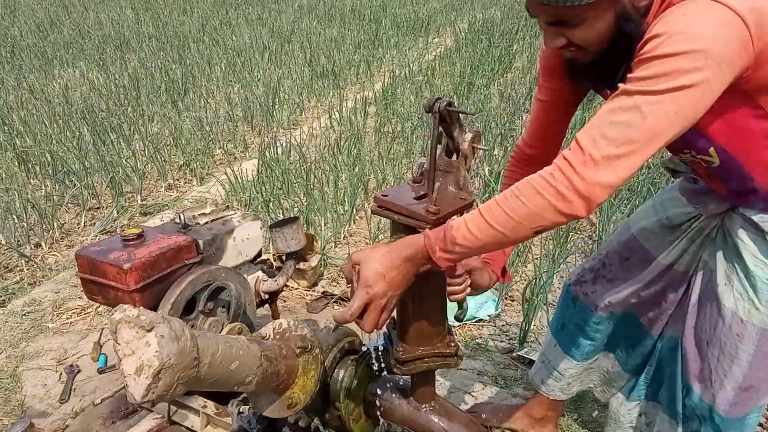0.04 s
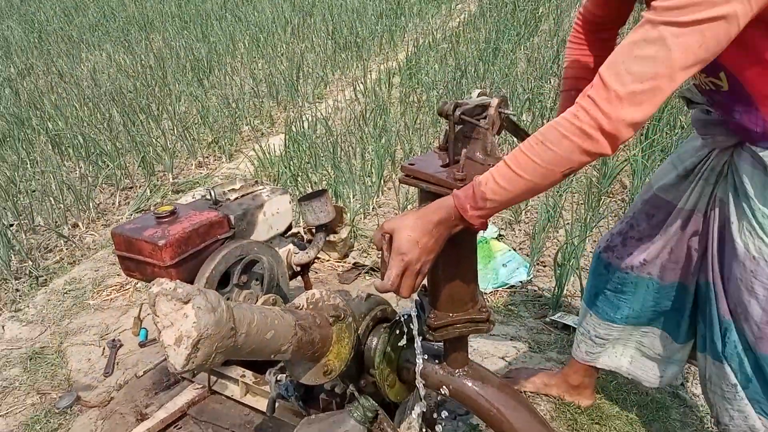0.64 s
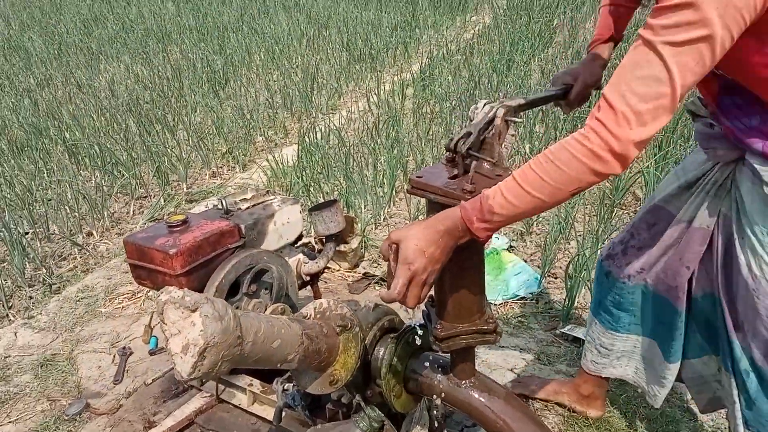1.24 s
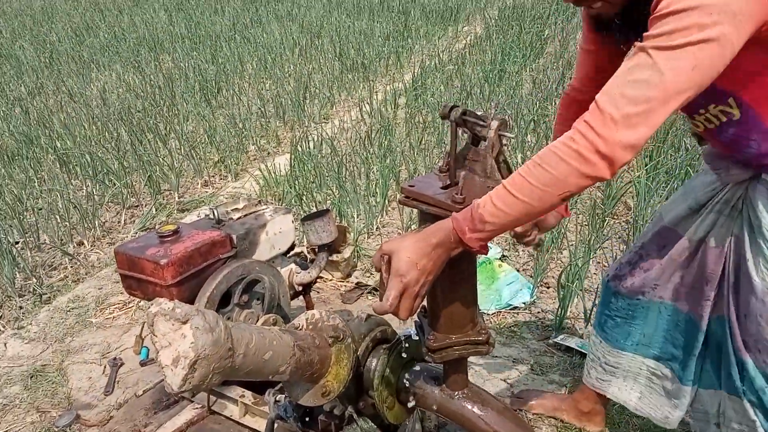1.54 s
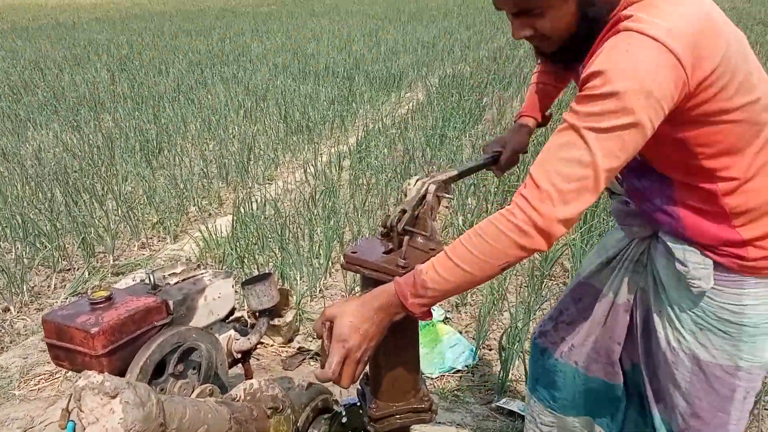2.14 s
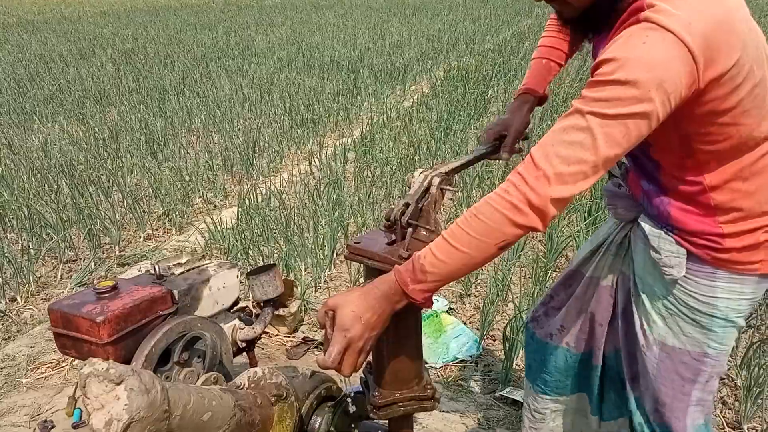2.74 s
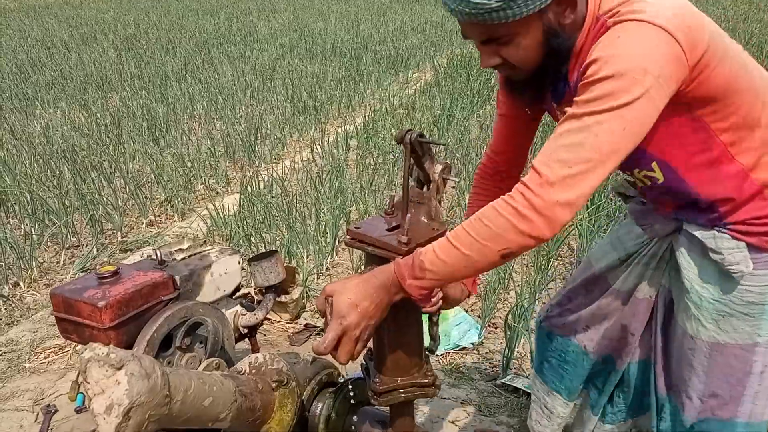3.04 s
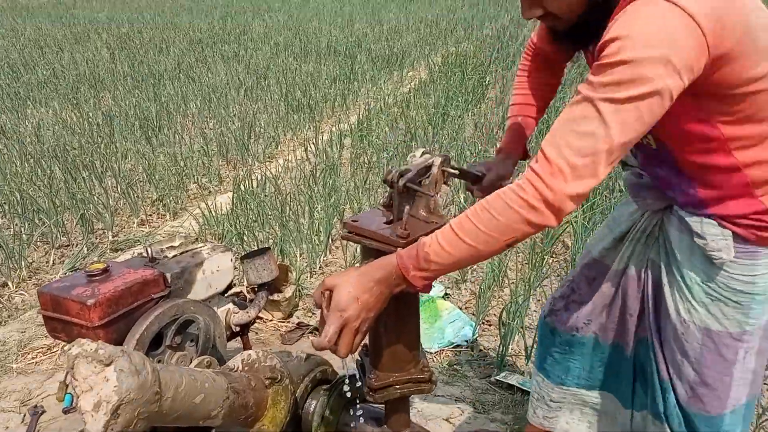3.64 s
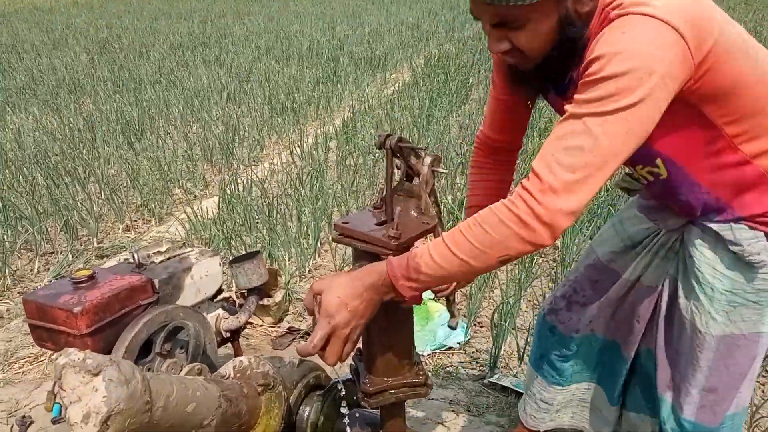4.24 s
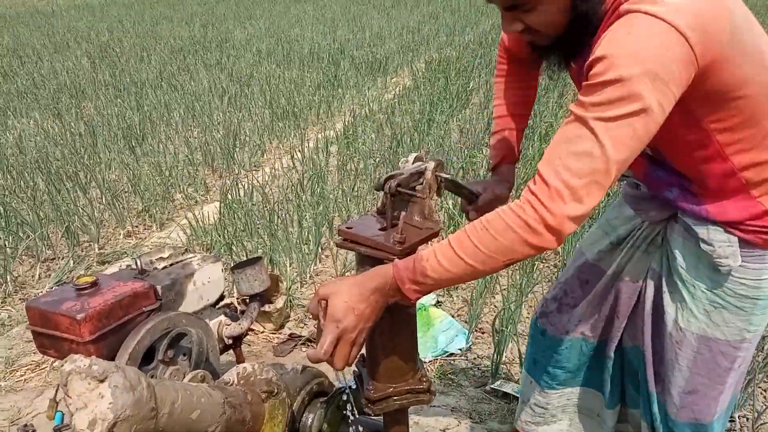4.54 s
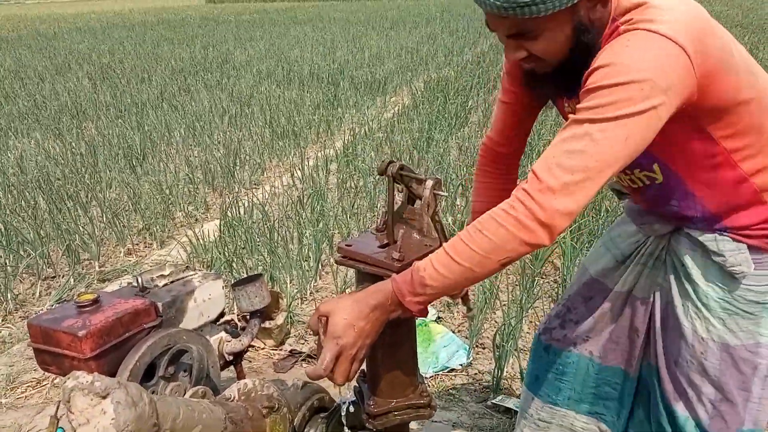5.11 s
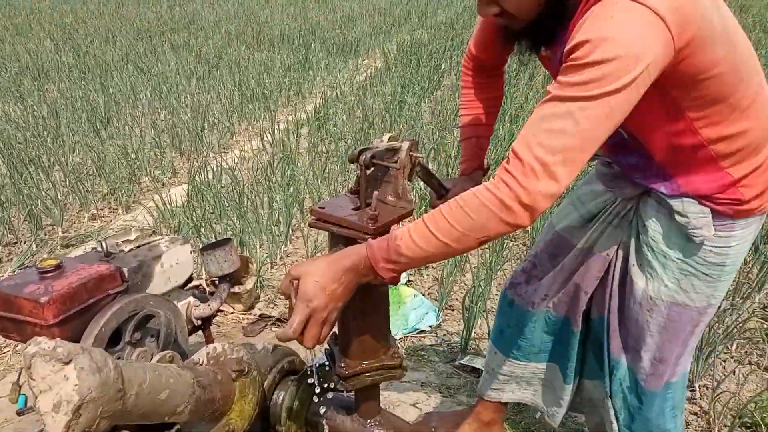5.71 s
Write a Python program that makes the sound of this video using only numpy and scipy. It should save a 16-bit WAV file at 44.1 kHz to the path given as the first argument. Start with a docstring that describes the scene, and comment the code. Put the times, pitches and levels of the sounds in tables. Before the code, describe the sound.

A cast-iron hand pump is worked quickly and steadily, a little over two strokes a second. Loose handle pins clank and rattle against the iron, and each stroke brings a hollow, fluttering gulp from the valve with sloshing, gurgling water and a spatter of spray. A faint rumble lies underneath, and a few tiny, very high squeaks come near the end. The microphone is close, in an open field with no echo.

```python
"""An open field, close to a cast-iron hand pump worked fast, about 2.5 strokes a second.
The leather valve flutters and slaps, and the wet barrel answers with a hollow gulp. Water sloshes,
its pitch following the piston; bubbles gurgle in the pipe, spray spatters from a leak and the pump
rumbles as it rocks. Loose handle pins clank and ring the iron, the rod scrapes, and late on a dry
spot squeaks."""
import sys
import numpy as np
from scipy import signal
from scipy.fft import rfft, irfft
from scipy.io import wavfile
from scipy.ndimage import uniform_filter1d

SR = 44100
rng = np.random.default_rng(int(sys.argv[2]) if len(sys.argv) > 2 else 0)


def dump(signal):
    """Clip the signal to [-1, 1] and save it as 16-bit WAV at the path in sys.argv[1]."""
    limited = np.clip(np.atleast_2d(signal).T, -1, 1)
    pcm = np.round(limited * 32767).astype(np.int16)
    wavfile.write(sys.argv[1], SR, pcm)


N = 254456
TIME = np.arange(N) / SR


def from_db(db):
    """Decibels to gain."""
    return 10 ** (np.asarray(db) / 20)


def unit_rms(x):
    """Scale to unit rms."""
    return x / np.sqrt(np.mean(x ** 2) + 1e-20)


def butter(x, hz, kind):
    """Second-order Butterworth filter."""
    return signal.sosfilt(signal.butter(2, hz, kind, fs=SR, output="sos"), x)


def wander(cutoff_hz, size=N):
    """Low-passed noise, unit rms."""
    return unit_rms(butter(rng.standard_normal(size), cutoff_hz, "low"))


def colour(x, points, size=4096):
    """Minimum-phase filter through points of f/Hz, level/dB."""
    hz, db = np.transpose(points)
    grid_hz = np.maximum(np.fft.rfftfreq(size, 1 / SR), 1)
    magnitude = from_db(np.interp(np.log(grid_hz), np.log(hz), db))
    cepstrum = irfft(np.log(magnitude))
    cepstrum[1:size // 2] *= 2
    cepstrum[size // 2 + 1:] = 0
    return signal.fftconvolve(x, irfft(np.exp(rfft(cepstrum))))[:len(x)]


def even(x, window_s):
    """Hold the level near 1 over the window; faster grain stays."""
    width = int(window_s * SR) + 1
    power = uniform_filter1d(uniform_filter1d(x ** 2, width), width)
    return x / np.sqrt(np.abs(power) + np.mean(x ** 2) / 100)


def clicks(per_s, spread_db, size=N):
    """Random clicks of uneven height and either sign."""
    heights = from_db(spread_db * np.minimum(rng.exponential(1, size), 4))
    return (rng.random(size) < per_s / SR) * heights * rng.choice([-1, 1], size)


def add(out, start_s, sound):
    """Mix a sound in from start_s."""
    at = max(int(start_s * SR), 0)
    out[at:at + len(sound)] += sound[:max(N - at, 0)]


def bump(centre_s, width_s):
    """Gaussian swell of height 1."""
    return np.exp(-((TIME - centre_s) / width_s) ** 2 / 2)


def cavity(x, hz, width_hz):
    """Steep-skirted resonance with moving pitch."""
    carrier = np.exp(2j * np.pi * np.cumsum(hz) / SR)
    pole = np.exp(-np.pi * width_hz / SR)
    return (carrier * signal.lfilter([1], [1, -2 * pole, pole * pole], x / carrier)).real


def bubbles(per_s, pitch_hz, spread, t60_cycles, chirp_per_s):
    """Bubbles form at random around a pitch; each rings briefly and rises."""
    out, t = np.zeros(N), np.arange(SR // 40) / SR
    births = clicks(per_s, spread_db=2.5)
    for at in np.flatnonzero(births):
        hz = pitch_hz[at] * np.exp(spread * rng.standard_normal())
        if hz < SR / 3:
            decay = births[at] * from_db(-60 * t * hz / t60_cycles)
            add(out, at / SR, decay * np.sin(2 * np.pi * hz * t * (1 + chirp_per_s * t)))
    return unit_rms(out)


# Handle down, piston lifts water: t/s, drive/s, flutter/dB, slosh/dB, spray/dB
LIFTS = [(-0.06, 0.12, -21, -41, -34.5), (0.39, .11, -17.5, -37.5, -35.5), (0.851, .12, -20, -41, -31.5),
         (1.328, .1, -22, -38.5, -35.5), (1.808, 0.093, -19.5, -37, -32),
         (2.291, 0.11, -22.5, -42.5, -35.5), (2.878, 0.17, -21.5, -34, -34.5),
         (3.391, 0.1, -22.5, -38.5, -33.5), (3.809, 0.079, -22.5, -33.5, -30.5),
         (4.2, 0.067, -20.5, -33.5, -29), (4.579, 0.11, -32, -38.5, -35), (4.949, 0.07, -24.5, -33.5, -27),
         (5.349, 0.073, -25, -33.5, -25.5), (5.701, 0.11, -25.5, -31, -36)]
# Handle up, piston sinks: t/s, drive/s, flutter/dB, slosh/dB, spray/dB, valve pop/dB
RETURNS = [(0.152, .13, -35, -44, -36.5, -27.5), (0.595, 0.26, -31, -37.5, -40, -28),
           (1.08, 0.12, -30, -37.5, -36.5, -27), (1.548, 0.19, -35, -39.5, -36, -44),
           (2.021, 0.12, -37.5, -37.5, -37, -34), (2.545, 0.15, -34, -42, -36.5, -23),
           (3.135, 0.12, -32, -43, -38, -27), (3.586, .12, -29.5, -34.5, -38.5, -25),
           (3.99, 0.12, -32.5, -32.5, -35.5, -22.5), (4.371, 0.12, -31.5, -33, -35.5, -36),
           (4.726, 0.16, -33.5, -37, -36.5, -26), (5.116, .16, -31, -35.5, -37, -26.5),
           (5.52, 0.21, -30.5, -32, -32.5, -25.5)]
# Surge envelopes, rows flutter, slosh, spray: attack/s, sag/(dB/s), release/(dB/s)
LIFT_SHAPE = [(0.036, 54, 264), (0.016, 28, 346), (0.062, 19.5, 349)]
RETURN_SHAPE = [(0.029, 22, 40), (0.031, 35, 160), (0.017, 20, 204)]
# Trickle between strokes: flutter/dB, slosh/dB, spray/dB
TRICKLE_DB = [-45, -65, -54.5]
# Trickle over time, dropping once the pump holds its water: t/s, level/dB
TRICKLE_LEVEL = [(0, -3), (2.5, 8.5), (3.1, -11), (5.77, -5)]

def water_flow():
    """Each half stroke surges, sags, lets go, over a trickle. Relative flutter, slosh, spray gains."""
    gains = from_db(np.add.outer(TRICKLE_DB, np.interp(TIME, *np.transpose(TRICKLE_LEVEL))))
    t = np.arange(SR // 2) / SR
    for half_strokes, shape in (LIFTS, LIFT_SHAPE), (RETURNS, RETURN_SHAPE):
        for start_s, drive_s, *levels_db in half_strokes:
            for gain, db, (attack_s, sag, release) in zip(gains, levels_db, shape):
                fall_db = sag * t + release * np.maximum(t - drive_s, 0)
                surge = np.minimum(t / attack_s, 1) * from_db(db - fall_db)
                add(gain, start_s, surge[start_s + t >= 0])
    return gains


def piston_height(last_lift_s=0.137):
    """Piston travel, 0 to 1, slowing at each turn."""
    turns_s = sorted(row[0] for row in LIFTS + RETURNS)
    turns_s.append(turns_s[-1] + last_lift_s)
    return (1 - np.cos(np.pi * np.interp(TIME, turns_s, np.arange(len(turns_s))))) / 2


# Barrel air modes: f piston down/Hz, f piston up/Hz, width/Hz, level/dB
BARREL_MODES = [(213, 293, 27, -8.5), (283.7, 322.5, 102, 6.5), (327, 428, 22, -2.5)]

def valve_flutter(height, per_s=75, jitter=0.25, spread_db=4.4):
    """The leather flap beats unevenly and rings the barrel, whose pitch climbs with the water."""
    timing, strength = rng.standard_normal((SR // 40, 2)).T
    at = np.cumsum(np.exp(jitter * timing) * SR / per_s).astype(int)
    beats = np.zeros(N)
    beats[at[at < N]] = from_db(spread_db * strength[at < N])
    churn = rng.standard_normal(N)
    drive = butter(unit_rms(beats) + churn, [140, 600], "band")
    out = np.zeros(N)
    for down_hz, up_hz, width_hz, db in BARREL_MODES:
        mode = cavity(drive, down_hz + (up_hz - down_hz) * height, width_hz)
        out += from_db(db) * even(mode, window_s=0.12)
    return even(out, window_s=0.032)


# Splash spectrum: f/Hz, level/dB
SLOSH_SPECTRUM = [(450, -10), (640, -13.5), (850, 6), (1180, 11), (1750, -15.5), (2400, -19.5)]

def slosh(height, down_hz=1070, up_hz=1480, bubbles_db=-3, splash_db=-4):
    """Splashes ring the air above the piston, which shrinks as it rises; bubbles chirp near that pitch."""
    air_hz = down_hz + (up_hz - down_hz) * height
    splashes = unit_rms(colour(clicks(per_s=900, spread_db=6.5), SLOSH_SPECTRUM))
    hollow = even(cavity(splashes, air_hz, width_hz=130), window_s=0.065)
    chirps = bubbles(150, air_hz, spread=0.33, t60_cycles=5.7, chirp_per_s=1.3)
    chirps = unit_rms(colour(chirps, SLOSH_SPECTRUM))
    return even(hollow + from_db(bubbles_db) * chirps + from_db(splash_db) * splashes, window_s=0.23)


# Casting modes: f/Hz, level/dB, t60/s
IRON_MODES = [(1344, 12.5, 0.014), (1815, 7, 0.029), (2015, 5, 0.066), (2215, 16.5, 0.008),
              (2820, -7.5, 0.2), (3171, 4.5, 0.1), (4351, 7.5, 0.047), (4695, -3, 0.15),
              (5340, -5.5, 0.082), (5430, 12.5, 0.023), (5967, 8, 0.063), (6440, -3.5, 0.1),
              (6930, -1, 0.14), (8830, 8, 0.016), (9380, 4, 0.066), (12070, -2, 0.027)]

def iron_ring(t, scatter_db, detune):
    """The casting's answer to one touch; load and contact point shift and favour modes. Unit energy."""
    hz, db, t60_s = np.transpose(IRON_MODES)[:, :, None]
    db = db + scatter_db * rng.standard_normal(hz.shape)
    hz = hz * (1 + detune * rng.standard_normal(hz.shape))
    decays = rng.choice([-1, 1], hz.shape) * from_db(db - 60 * t / t60_s)
    ring = (decays * np.sin(2 * np.pi * hz * t)).sum(0)
    return ring / np.linalg.norm(ring)


# Spatter spectrum: f/Hz, level/dB
SPRAY_SPECTRUM = [(900, -3), (1600, 2.5), (2000, 3.5), (3100, 3), (3700, -2.5), (4400, 1), (5050, -9),
                  (6300, 4.5), (7900, -5), (9500, -5), (11000, -4), (13000, -21), (15500, -3)]

def spray(ring_db=-7, fizz_db=-1, spurt_db=7.5, spurt_hz=70):
    """Drops and tiny bubbles spatter in spurts; the wet rod rubs, keeping the iron faintly ringing."""
    spurts = from_db(spurt_db * wander(spurt_hz))
    drops = unit_rms(spurts * clicks(per_s=12000, spread_db=4))
    fizz = bubbles(1900, np.full(N, 4800.), spread=0.66, t60_cycles=114, chirp_per_s=0.55)
    spatter = unit_rms(colour(drops + from_db(fizz_db) * fizz, SPRAY_SPECTRUM))
    ring = signal.fftconvolve(drops, iron_ring(TIME[:SR // 5], scatter_db=0, detune=0))[:N]
    return even(spatter + from_db(ring_db) * unit_rms(ring), window_s=0.072)


# Large air pockets in the pipe: t/s, lowest f/Hz, level/dB
GLUGS = [(1.09, 680, -57), (1.43, 687, -44), (1.565, 468, -34), (1.96, 614, -39), (2.04, 456, -38.5),
         (4.422, 447, -31.5), (5.55, 510, -48)]

def gurgle(flow, height, down_hz=750, up_hz=810, flow_db=-15, pull_db=-44, return_db=-47, burst_db=3):
    """Bubbles burst in the pipe and sound its air column; a large pocket drops the pitch."""
    hz = down_hz + (up_hz - down_hz) * height
    pull_ends = sum(bump(start_s + drive_s, width_s=0.028) for start_s, drive_s, *_ in LIFTS)
    return_starts = sum(bump(start_s + 0.04, width_s=0.028) for start_s, *_ in RETURNS)
    gain = from_db(flow_db) * flow + from_db(pull_db) * pull_ends + from_db(return_db) * return_starts
    for centre_s, glug_hz, db in GLUGS:
        hz += (glug_hz - hz) * bump(centre_s, width_s=0.0686)
        gain += from_db(db) * bump(centre_s, width_s=0.022)
    column = even(cavity(clicks(per_s=200, spread_db=-0.5), hz, width_hz=59), window_s=0.058)
    bursts = unit_rms(from_db(burst_db * wander(cutoff_hz=28)))
    return gain * bursts * column


# Rumble spectrum: f/Hz, level/dB
RUMBLE_SPECTRUM = [(25, -42), (60, -8.5), (90, -1.5), (125, -0.5), (170, -3), (400, -45.5)]
# Loudness of the low rumble, dipping near 3.8 s: t/s, level/dB
RUMBLE_LEVEL = [(0, 1.5), (3.1, 0), (3.8, -5), (4.5, 0.5), (5.77, -1.5)]

def rumble(flutter_gain, base_db=-44):
    """The pump rocks on its pipe, more when the valve works hard."""
    rocking = colour(clicks(per_s=110, spread_db=5), RUMBLE_SPECTRUM)
    level_db = base_db + np.interp(TIME, *np.transpose(RUMBLE_LEVEL))
    return from_db(level_db) * unit_rms(flutter_gain ** 0.2 * rocking)


# Foot valve slaps and hard knocks that jolt the water: t/s, level/dB, f/Hz, push/s
GULPS = [(0.003, -23.5, 292, .016), (0.393, -17, 318.5, 0.023), (0.755, -31, 142, 0.01),
         (0.85, -22, 315, 0.028), (0.907, -21.5, 338, 0.034), (1.195, -20.5, 287, 0.01),
         (1.322, -19, 278.5, 0.038), (1.494, -22, 291, 0.026), (1.715, -26, 128, 0.0083),
         (1.807, -21.5, 310, .01), (1.844, -22, 333, 0.019), (1.961, -20, 328, 0.03),
         (2.15, -26.5, 305, 0.019), (2.289, -18, 310, 0.031), (2.343, -22.5, 347.5, .026),
         (2.472, -19.5, 318, 0.0073), (2.68, -24.5, 262, 0.017), (2.832, -30.5, 124, 0.022),
         (2.887, -24.5, 273, 0.026), (2.947, -22.5, 322, .015), (3.036, -26, 368, 0.021),
         (3.207, -25.5, 351, 0.031), (3.395, -14.5, 312, 0.012), (3.808, -13.5, 301, 0.0055),
         (4.11, -24.5, 306, 0.028), (4.201, -15.5, 300, 0.029), (4.257, -23, 303, .036),
         (4.485, -21.5, 276, 0.027), (4.581, -10, 299, 0.0049), (4.873, -19.5, 278, 0.011),
         (4.948, -18, 317.8, 0.058), (5.239, -22, 278, .008), (5.334, -17, 274, 0.0092),
         (5.349, -16.5, 322.5, 0.044), (5.619, -15.5, 292, .028), (5.73, -18, 249, 0.009),
         (5.752, -17.5, 316, 0.013)]

def gulps(rise_s=0.0073, t60_s=0.063, glide_per_s=1.0, overtone_db=-25, pop_hz=350):
    """A valve slaps; trapped air bounces on the water, its pitch creeping up as the pocket shrinks."""
    out, t = np.zeros(N), np.arange(SR // 5) / SR
    # the piston valve pops open on each return
    pops = [(start_s + 0.05, pop_db, pop_hz, 0.026) for start_s, *_, pop_db in RETURNS]
    for start_s, db, hz, push_s in GULPS + pops:
        attack = np.sin(np.pi / 2 * np.minimum(t / rise_s, 1))
        decay = from_db(-60 * np.maximum(t - 0.77 * push_s, 0) / t60_s)
        phase = 2 * np.pi * np.cumsum(hz * (1 + glide_per_s * (t - push_s / 2))) / SR
        tone = np.sin(phase) + from_db(overtone_db) * np.sin(1.6 * phase)
        add(out, start_s, np.sqrt(2) * from_db(db) * attack * decay * tone)
    return out


# Contact spectrum: f/Hz, level/dB
CRACK_SPECTRUM = [(300, -4), (650, -8.5), (1000, -2), (2000, -6.5), (3100, 5.5), (3700, -3.5), (4400, 2),
                  (5050, -6.5), (6200, 2.5), (7000, 2.5), (7900, -9), (9500, -4.5), (12500, -13),
                  (15500, -15.5)]
# Pin blows: t/s, level/dB, rattle/s, dullness/dB (heavy > 0, glancing < 0)
CLANKS = [(0.132, -39, 0.0024, 7), (0.222, -27.5, 0.022, -3.5), (0.292, -29.5, 0.0052, -0.5),
          (0.345, -26, 0.017, -0.5), (0.382, -29, 0.018, -3), (0.488, -27.5, 0.0027, 5),
          (0.574, -40, 0.0019, 7), (0.695, -27, 0.0086, -1.5), (0.777, -25.5, 0.011, -2.5),
          (0.797, -23.5, 0.0061, 0), (0.852, -24, 0.0089, -3), (0.895, -24, 0.0026, 1.5),
          (1.029, -33.5, 0.0018, 19), (1.158, -32, 0.0098, -8.5), (1.247, -27.5, 0.048, -2.5),
          (1.316, -24, 0.008, 0), (1.492, -25, 0.004, 7), (1.627, -30, 0.0083, -3), (1.741, -27, 0.027, 0),
          (1.784, -29, 0.022, -1), (1.804, -29, 0.0057, 0.5), (1.959, -22.5, 0.0072, 4),
          (2.035, -31.5, 0.015, 4), (2.193, -29, 0.012, 0.5), (2.225, -24.5, 0.025, 0.5),
          (2.282, -22.5, 0.0078, 4.5), (2.473, -24, 0.0025, 7), (2.638, -29.5, 0.013, -2),
          (2.748, -27.5, 0.018, 2), (2.822, -32.5, 0.0086, 4.5), (2.87, -26.5, 0.015, -4.5),
          (2.895, -25, 0.0095, 3.5), (3.046, -30.5, 0.01, 2), (3.215, -30, 0.029, -1.5),
          (3.268, -31, 0.0045, 4.5), (3.312, -29.5, 0.019, -3.5), (3.332, -27.5, 0.029, 1),
          (3.383, -22.5, 0.01, 2), (3.671, -31, 0.026, -9), (3.76, -30, 0.0034, 5.5),
          (3.787, -26.5, 0.012, -7.5), (3.848, -25.5, 0.016, 9), (4.076, -29, 0.004, -8),
          (4.157, -23.5, 0.019, -1.5), (4.198, -24, 0.0037, -2), (4.451, -29.5, 0.012, -6.5),
          (4.526, -32, 0.025, -9), (4.538, -26, 0.023, 5), (4.569, -22.5, .01, 2),
          (4.608, -24.5, 0.0082, -0.5), (4.822, -31.5, 0.0062, -6.5), (4.871, -27.5, 0.0062, -2.5),
          (4.937, -26, 0.012, -4.5), (4.978, -22.5, 0.0055, 3), (5.194, -32.5, .017, -10),
          (5.244, -27.5, 0.0036, 13), (5.287, -25.5, 0.03, -3.5), (5.333, -24.5, 0.01, 2),
          (5.596, -29, .003, -12), (5.65, -29.5, 0.013, 0), (5.673, -22.5, 0.0054, -6),
          (5.718, -24, 0.0092, -6.5)]

def clanks(rise_s=0.0015, t60_s=0.043, contacts_per_s=3500, ring_db=-2):
    """A pin hits its seat and chatters: a burst of tiny contacts cracks and rings the iron."""
    out, t = np.zeros(N), np.arange(SR // 7) / SR
    for start_s, db, rattle_s, dull_db in CLANKS:
        pressure = np.minimum(t / rise_s, 1) * from_db(-60 * np.maximum(t - rattle_s, 0) / t60_s)
        contacts = pressure * even(clicks(contacts_per_s, spread_db=3.5, size=len(t)), window_s=0.004)
        contacts[0] += 6  # first strike
        ring = signal.fftconvolve(contacts, iron_ring(t, scatter_db=5.5, detune=0.0079))[:len(t)]
        crack = unit_rms(colour(contacts, CRACK_SPECTRUM))
        tilt = [(2800, 3 + dull_db), (4600, 0), (7000, 0), (9000, -6 - 0.83 * dull_db)]
        hit = colour(crack + from_db(ring_db) * unit_rms(ring), tilt, size=512)
        rattle_rms = np.std(hit[:int((rattle_s + rise_s) * SR) + 2])
        add(out, start_s, from_db(db) * hit / rattle_rms)
    return out


def scrape_gain(lead_s=0.011, width_s=0.014, db=-36):
    """Brief hissy scrape of the rod as slack is taken up before each lift; a gain on the spray noise."""
    return from_db(db) * sum(bump(start_s - lead_s, width_s) for start_s, *_ in LIFTS)


# Bright spits of water from the leak: t/s, level/dB
BRIGHT_TICKS = [(0.388, -38), (0.702, -36), (1.31, -41), (1.803, -35), (3.382, -35), (3.682, -40),
                (3.795, -35), (5.735, -41)]

def bright_ticks(width_s=0.006, highpass_hz=9500):
    """Water spits from the leak in a short, very high crackle."""
    crackle = unit_rms(butter(clicks(per_s=10000, spread_db=3), highpass_hz, "high"))
    return crackle * sum(from_db(db) * bump(centre_s, width_s) for centre_s, db in BRIGHT_TICKS)


# Pin squeaks: t/s, length/s, start f/Hz, end f/Hz, level/dB
SQUEAKS = [(4.242, 0.062, 15450, 14950, -36), (4.646, 0.021, 14990, 15060, -25),
           (5.696, 0.031, 15100, 14900, -35)]

def squeaks(waver_hz=50):
    """A dry spot on a pin sings very high for a moment."""
    out = np.zeros(N)
    for start_s, length_s, start_hz, end_hz, db in SQUEAKS:
        size = int(length_s * SR)
        hz = np.linspace(start_hz, end_hz, size) + waver_hz * wander(cutoff_hz=300, size=size)
        tone = np.sqrt(2) * np.sin(2 * np.pi * np.cumsum(hz) / SR)
        add(out, start_s, from_db(db) * np.hanning(size) * tone)
    return out


def scene(flow_mix_db=-2.5):
    """Valve, water and iron from close by, with nothing around to echo. Mono."""
    flutter_gain, slosh_gain, spray_gain = water_flow()
    height = piston_height()
    mix = from_db(flow_mix_db)
    barrel = gulps() + mix * flutter_gain * valve_flutter(height) + gurgle(slosh_gain, height)
    water_and_rod = mix * (slosh_gain * slosh(height) + (spray_gain + scrape_gain()) * spray())
    iron = rumble(flutter_gain) + clanks() + squeaks() + bright_ticks()
    return (barrel + water_and_rod + iron)[None]


def record(dry, ceiling=0.42, cutoff_hz=15900):
    """Soft clip, then steep low-pass."""
    rounded = dry / (1 + (dry / ceiling) ** 4) ** (1 / 4)
    return signal.sosfilt(signal.ellip(12, 0.1, 90, cutoff_hz, fs=SR, output="sos"), rounded)


dry = scene()
out = record(dry)
dump(out)
```